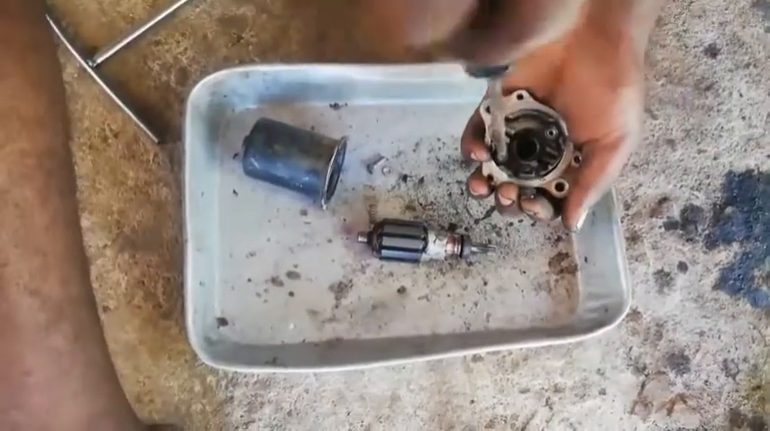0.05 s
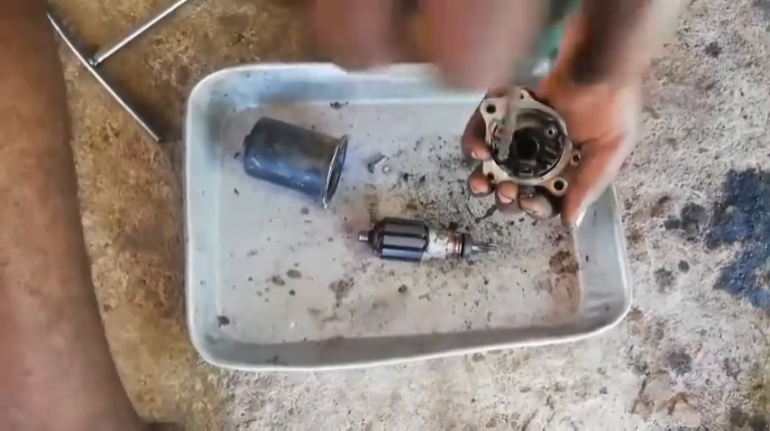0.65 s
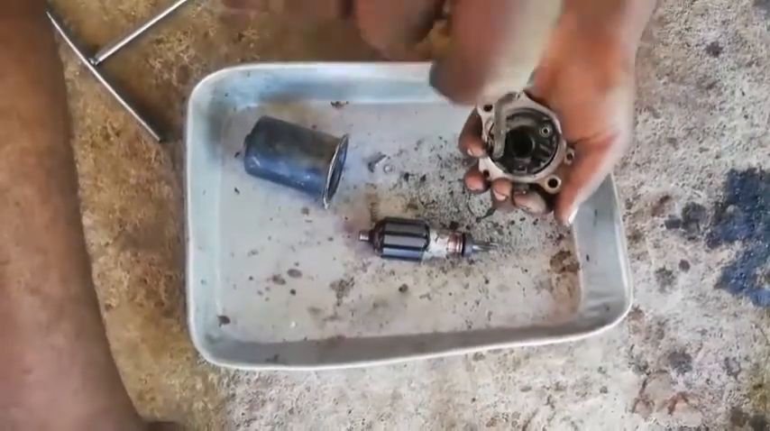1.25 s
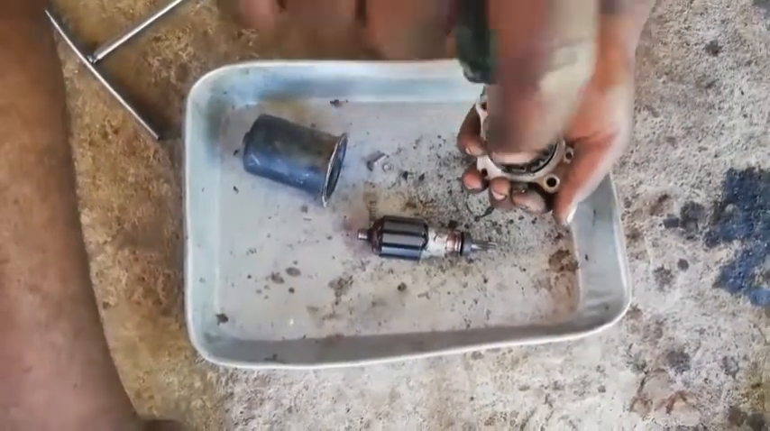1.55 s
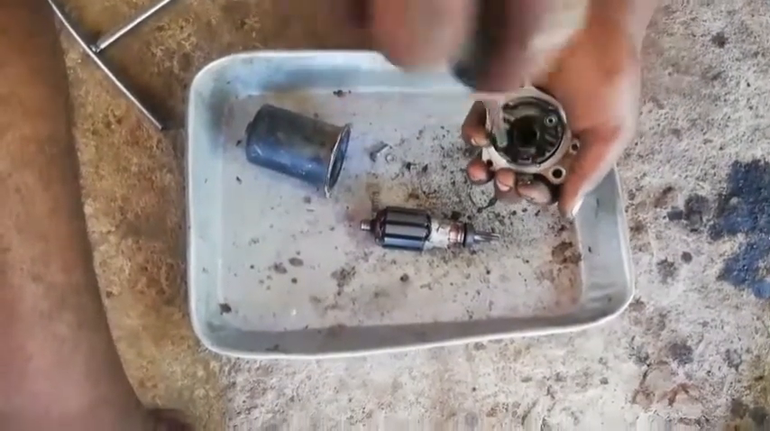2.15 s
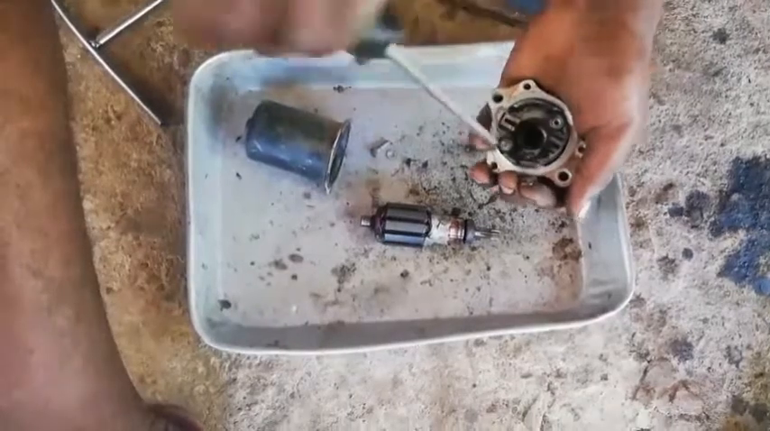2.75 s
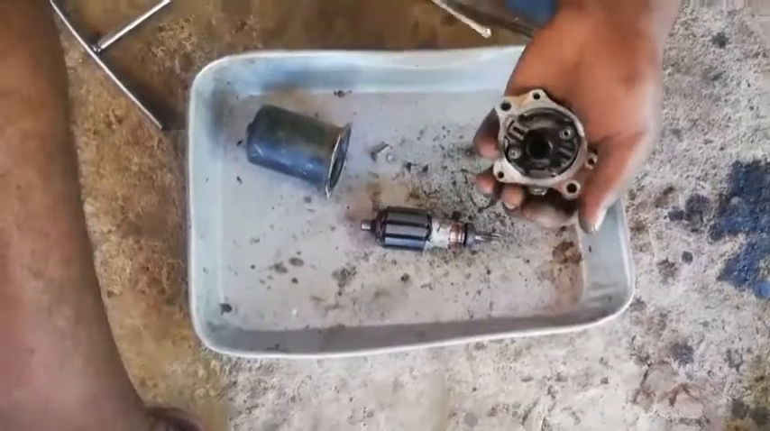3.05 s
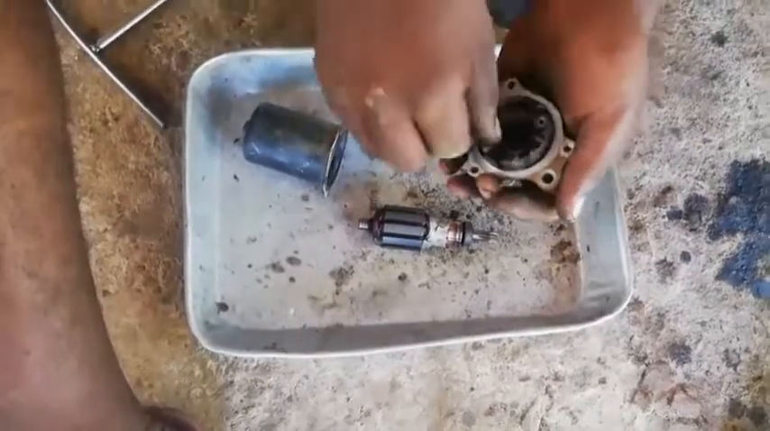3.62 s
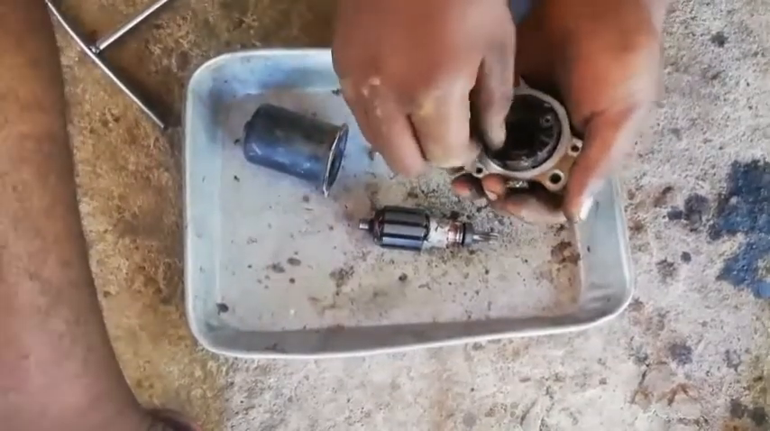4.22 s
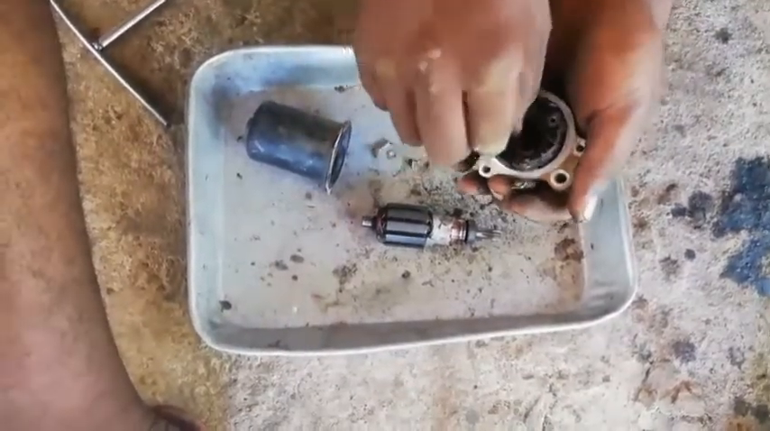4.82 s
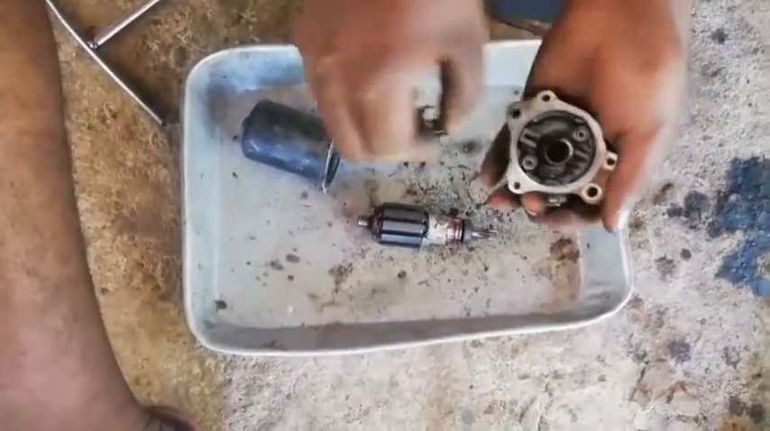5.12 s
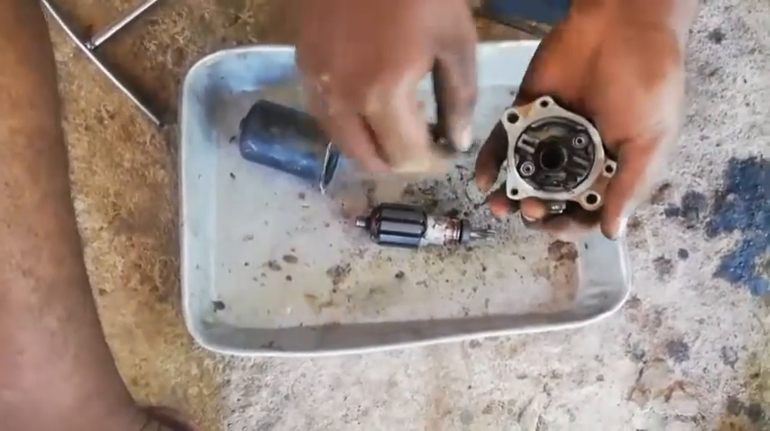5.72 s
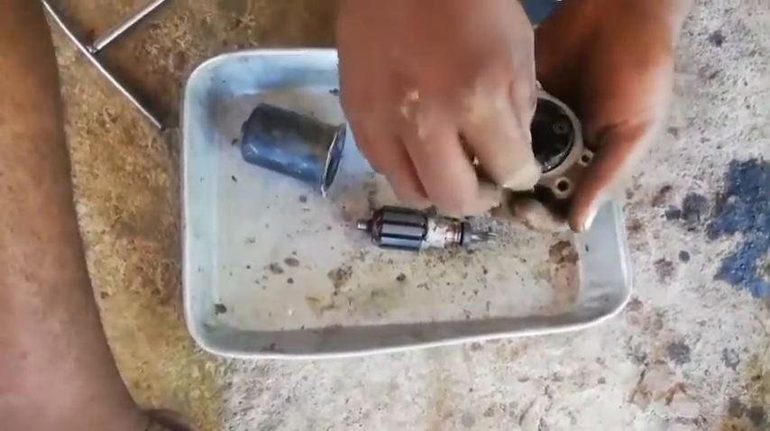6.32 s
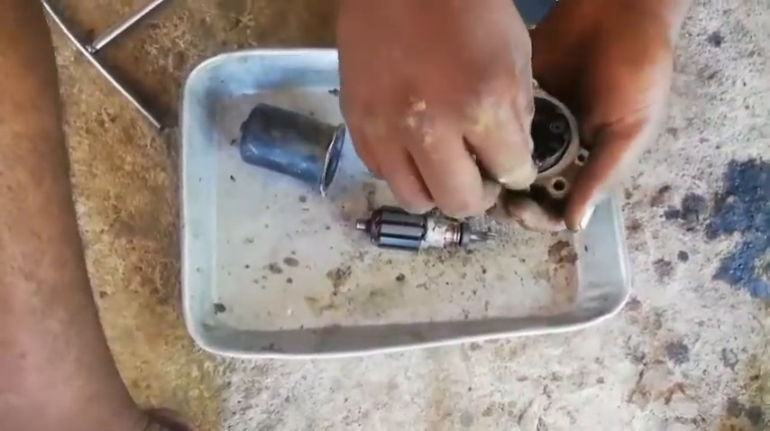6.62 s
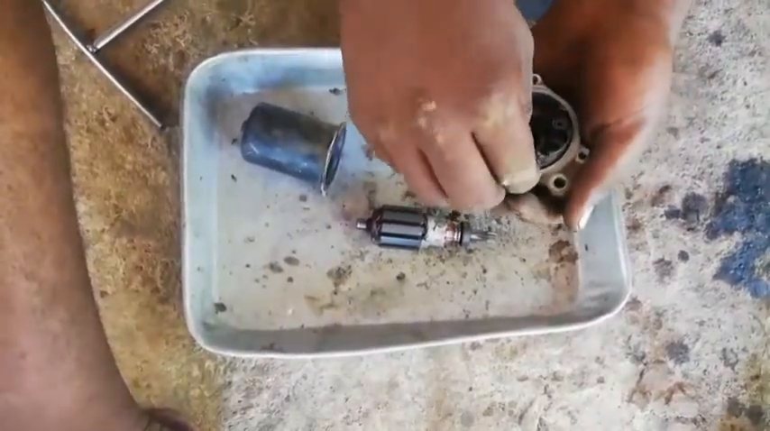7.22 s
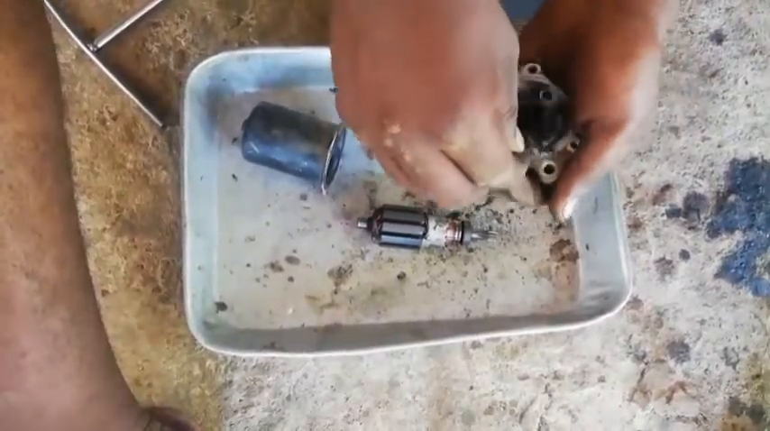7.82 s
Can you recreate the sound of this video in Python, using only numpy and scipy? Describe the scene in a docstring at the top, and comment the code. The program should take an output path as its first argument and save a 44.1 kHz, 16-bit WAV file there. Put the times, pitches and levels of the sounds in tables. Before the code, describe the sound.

Someone takes a small electric motor apart close to the microphone in a sheltered yard. Dull knocks and short scrapes lead to the thin ring of a steel screwdriver, then a few sharp spring snaps. A dropped metal part crashes and rattles in a tray, and later a stuck piece gives way with a brief rough chatter. Chicks peep nearly throughout, with distant birds, steady hiss and a low, far engine behind.

```python
"""Under an open shelter, chicks peep close by over yard hiss and the hum of a far engine; distant birds
whistle now and then. A small electric motor is taken apart over a tray. A screwdriver knocks on the
housing, metal scrapes over grit, and at about 3 s the screwdriver is put down, its steel shaft ringing.
A small spring snaps. At 5.5 s a metal part falls, bounces and shakes the tray. Near the end a tight
part sticks, slips and gives way in three quick jerks."""
import sys
import numpy as np
from scipy import signal
from scipy.fft import rfft, irfft
from scipy.io import wavfile

SR = 44100
rng = np.random.default_rng(int(sys.argv[2]) if len(sys.argv) > 2 else 0)


def int16_out(signal):
    """Quantize to a 16-bit WAV file."""
    q = np.round(np.clip(np.atleast_2d(signal).T, -1, 1) * 32767)
    wavfile.write(sys.argv[1], SR, q.astype(np.int16))


N = 355886


def from_db(db):
    """Turn decibels into a number to multiply a sound by."""
    return 10 ** (np.asarray(db) / 20)


def rms_one(x):
    """Scale a sound so that its average power is 1."""
    return x / np.sqrt(np.mean(x ** 2) + 1e-20)


def in_time(rows):
    """Join (time, value) points with straight lines, giving a value at every sample."""
    return np.interp(np.arange(N) / SR, *np.transpose(rows))


def at_hz(points, hz):
    """Read between the rows of a (frequency, value) table, with every octave equally wide."""
    known_hz, value = np.transpose(points)
    return np.interp(np.log(np.maximum(hz, 1)), np.log(known_hz), value)


def drift(rate):
    """A random curve around zero that heads for a new value `rate` times a second."""
    knots = rng.standard_normal(4000)
    return np.interp(np.arange(N) / SR * rate, np.arange(len(knots)), knots)


def convolve(x, response):
    """Pass a sound through a filter or a space, given its response to a single click."""
    return signal.fftconvolve(np.atleast_2d(x), np.atleast_2d(response), axes=-1)[:, :N]


def colour(x, points, size=4096):
    """Make each frequency louder or softer as a (frequency, level) table says."""
    gains = from_db(at_hz(points, np.fft.rfftfreq(size, 1 / SR)))
    cepstrum = irfft(np.log(gains))
    # fold the second half onto the first, so the filter never sounds ahead of a hit (minimum phase)
    cepstrum[1:size // 2] *= 2
    cepstrum[size // 2 + 1:] = 0
    return convolve(x, irfft(np.exp(rfft(cepstrum))))


def add(track, s, sound):
    """Mix a sound into a track, starting at s seconds."""
    start = max(int(s * SR), 0)
    track[..., start:start + sound.shape[-1]] += sound[..., :N - start]


def struck(hits, modes, spread_db, contact_s):
    """Each hit rings an object's own tones (modes) unevenly; t60 is the time to fade by 60 dB."""
    out = np.zeros(N)
    t = np.arange(int(SR * max(t60 for _, _, t60 in modes))) / SR
    rise = 1 - np.exp(-(t / contact_s) ** 2)   # the force builds up during the contact
    for s, level_db in hits:
        for k, (hz, mode_db, t60) in enumerate(modes):
            strength_db = level_db + mode_db + spread_db * rng.standard_normal()
            envelope = rise * from_db(strength_db - 60 * t / t60)
            add(out, s, (-1) ** k * envelope * np.sin(2 * np.pi * hz * t))
    return out


def bursts(hits, t60):
    """A fading crack of noise for every hit, different at each microphone."""
    power, t = np.zeros(N), np.arange(SR // 2) / SR
    for s, level_db in hits:
        add(power, s, from_db(level_db - 60 * t / t60) ** 2)
    return np.sqrt(power) * rng.standard_normal((2, N))


def dying_runs(events, gap_s, count=4):
    """Turn each event into a quick, uneven run of ever weaker hits: rows of t/s, level/dB."""
    uneven = rng.uniform(-.15, .15, (len(events), count))
    return [(s + gap_s * (k + (k > 0) * nudge[k]), level_db - loss_db * k)
            for (s, level_db, loss_db), nudge in zip(events, uneven) for k in range(count)]


def whistles(calls, bend, waver, rasp, flutter_db, overtone_db, swell):
    """Calls slide in pitch and turn raspy. More bend delays the slide; more swell delays the peak."""
    out = np.zeros(N)
    wobble, tremor, flutter = waver * drift(120), rasp * drift(480), flutter_db * drift(90)
    for s, length, held_hz, end_hz, level_db in calls:
        progress = np.linspace(0, 1, int(length * SR))
        now = np.clip(int(s * SR) + np.arange(len(progress)), 0, N - 1)
        slide_hz = held_hz + (end_hz - held_hz) * progress ** bend
        hz = slide_hz * (1 + wobble[now] + progress * tremor[now])
        phase = 2 * np.pi * np.cumsum(hz) / SR
        envelope = from_db(level_db + flutter[now]) * np.sqrt(np.abs(np.sin(np.pi * progress ** swell)))
        add(out, s, envelope * (np.sin(phase) + from_db(overtone_db) * np.sin(2 * phase)))
    return out


def yard():
    """Hiss from all around slowly quietens, over a low rumble that is the same on both sides."""
    hiss_tone = [(30, -20.5), (140, -6.5), (280, -4.5), (420, -7.5), (700, -6.5), (930, -1), (1300, -4.5),
                 (1950, 1), (2900, -8.5), (4500, -8.5), (5800, -18), (8100, -13.5), (10500, -27.5),
                 (15500, -50)]   # lows and highs of the hiss: f/Hz, relative level/dB
    hiss_level = [(0, -36), (1.1, -36), (2.9, -38), (6.0, -39.5), (8.07, -42)]   # its slow fade: t/s, level/dB
    rumble_tone = [(15, -14), (35, -3), (60, -0.5), (110, 0), (200, -10), (400, -19), (900, -43.5)]   # lows and highs of the rumble: f/Hz, relative level/dB
    hiss = rms_one(colour(rng.standard_normal((2, N)), hiss_tone))
    hiss *= from_db(in_time(hiss_level) + .5 * drift(5.5))
    rumble = rms_one(colour(rng.standard_normal(N), rumble_tone))
    rumble *= from_db(-53.5 + 1.4 * drift(4.3))
    return hiss + rumble


def far_engine():
    """A far engine hums on one low, wavering note."""
    hum_level = [(0, -50.5), (.6, -50), (1.5, -57.5), (2.2, -52), (3.1, -57), (4.5, -51), (5.9, -59.5),
                 (7.0, -49), (8.07, -54.5)]   # the hum swells and sinks: t/s, level/dB
    hum_hz, waver = 85.4, .028
    phase = 2 * np.pi * np.cumsum(hum_hz * (1 + waver * drift(14))) / SR
    flutter = from_db(1.5 * drift(13))
    return rms_one(np.sin(phase) * flutter) * from_db(in_time(hum_level))


def chicks():
    """Chicks give thin, short peeps that hold their pitch, then drop with a rasp."""
    peeps = [(.04, 5010, 295, -39), (.26, 4845, 150, -33.5), (.44, 5080, 245, -43),
             (0.959, 4880, 200, -46.5), (1.47, 4800, 80, -40.5), (1.58, 4950, 250, -47),
             (2.0, 5050, 304, -40.5), (2.13, 4830, 250, -40), (2.559, 4740, 202, -44),
             (3.055, 4720, 40, -29.5), (3.36, 4960, 398, -44.5), (3.48, 4820, 351, -36.5),
             (3.659, 4680, 150, -36), (3.79, 5196, 344, -32.5), (3.885, 4954, 690, -26.5),
             (4.002, 4856, 406, -32), (4.169, 5214, 200, -32.5), (4.36, 5110, 49.7, -29.5),
             (4.54, 5120, 550, -28.5), (4.70, 5120, 250, -29.5), (4.898, 4840, 393, -31.5),
             (5.081, 5110, 505, -29), (5.274, 4820, 450, -26.5), (5.375, 4783, 101, -25),
             (5.647, 4765, 360, -30.5), (5.83, 4900, 310, -35), (6.05, 5020, 60.3, -31),
             (6.205, 4955, 149, -33), (6.385, 4804, 398, -32), (6.581, 4927, 116, -29),
             (6.755, 5040, 700, -26), (6.944, 4610, 199, -34), (7.09, 4590, 150, -45),
             (7.301, 4700, 247, -41.5)]   # one row a peep: t/s, held pitch/Hz, closing drop/Hz, relative level/dB
    peep_s = .115
    calls = [(s, peep_s, hz, hz - drop_hz, level_db) for s, hz, drop_hz, level_db in peeps]
    return from_db(0.64) * whistles(calls, bend=2.5, waver=0.0032, rasp=.027, flutter_db=2.25,
                                    overtone_db=-18, swell=1.43)


def far_birds():
    """Birds out in the open give faint, longer whistles."""
    # one row a whistle: t/s, length/s, first pitch/Hz, end pitch/Hz, relative level/dB
    calls = [(.35, 0.26, 3460, 3220, -49), (2.45, 0.48, 3590, 3890, -45.5), (5.95, 0.25, 3950, 4220, -43.5),
             (6.10, 0.52, 3610, 3440, -48.5), (6.48, 0.5, 3200, 3150, -52), (6.46, 0.34, 840, 913, -47.5)]
    return from_db(-1) * whistles(calls, bend=1.3, waver=0.011, rasp=0.0086, flutter_db=4.5,
                                  overtone_db=-30, swell=1.0)


def knocks():
    """The screwdriver knocks on the housing; each dull thud dies away almost at once."""
    hits = [(0.594, -24, 1830), (2.3583, -12.5, 1054), (2.828, -28.5, 68.4), (3.03, -26, 1150),
            (3.1226, -2, 976), (3.204, -10.5, 1044), (3.371, -17, 990), (3.402, -24.5, 470),
            (3.421, -29.5, 458), (5.384, -11.5, 1444), (5.399, -14.5, 1400)]   # one row a knock: t/s, level/dB, thud pitch/Hz
    tones = [(.93, -4.5, 0.019), (1.16, 4, 0.011), (.52, -19, 0.072), (.38, -20.5, 0.033),
             (.26, -26, 0.077), (1.8, -8.5, 0.033), (2.25, -13, 0.016), (3.9, -30, 0.0054)]   # tones in a thud: multiple of its pitch, relative level/dB, t60/s
    out = np.zeros(N)
    for s, level_db, hz in hits:
        modes = [(hz * ratio, db, t60) for ratio, db, t60 in tones]
        out += struck([(s, level_db)], modes, spread_db=4.0, contact_s=0.00042)
    return out


def scrapes():
    """Metal is dragged over grit, and the many uneven grains make a rough noise."""
    drags = [(2.992, 0.06, -29.5), (3.04, .085, -32.5), (3.123, .012, -20.5), (3.369, 0.041, -38.5),
             (3.796, .025, -38.5), (5.374, 0.026, -29)]   # one row a drag: t/s, length/s, level/dB
    grit_tone = [(100, -11), (700, -9.5), (1150, 8), (1600, -2.5), (2300, 10.5), (3100, 0), (6000, -7),
                 (9000, -8.5), (12000, -17.5), (15500, -30)]   # lows and highs of the scrape: f/Hz, relative level/dB
    pressure = np.zeros(N)
    for s, length, level_db in drags:
        arch = np.abs(np.sin(np.linspace(0, np.pi, int(length * SR)))) ** .5
        add(pressure, s, from_db(level_db) * arch)
    grains = rng.standard_normal((2, N)) * from_db(3.9 * drift(450))
    return pressure * rms_one(colour(grains, grit_tone))


def shaft_ring():
    """The screwdriver is put down, and its free steel shaft rings on in clear tones."""
    hits = [(3.1305, -25.5)]   # the shaft touches down: t/s, relative level/dB
    modes = [(2560, -5, .25), (3457, 1.5, .55), (4148, -12, .55), (4702, -3, .3), (5200, -10.5, .55),
             (6374, -15, .34), (6683, -6, .58), (8075, -7, .55), (8145, -8, .38), (8803, 1, .58),
             (9464, -7, .3), (10330, -18, .33), (11670, -15, .36), (12980, -16.5, .28)]   # the shaft's tones: f/Hz, relative level/dB, t60/s
    return from_db(0.5) * struck(hits, modes, spread_db=.5, contact_s=.0008)


def spring_snaps():
    """A small spring snaps with bright clicks, nearer the right microphone."""
    hits = [(3.6772, -22), (3.6806, -8), (3.686, -38), (3.808, -28), (3.975, -23.5), (5.4525, -22)]   # one row a snap: t/s, relative level/dB
    modes = [(1800, -28, 0.011), (3630, -7, 0.0079), (6220, -1, 0.015), (7800, -3, 0.012),
             (8620, -2.5, 0.005), (11200, -22, 0.0062)]   # the spring's tones: f/Hz, relative level/dB, t60/s
    balance = [
        [-6],
        [1.0],
    ]   # left row, then right row: gain/dB
    return from_db(balance) * struck(hits, modes, spread_db=1.0, contact_s=.0003)


def clatter():
    """A metal part crashes down, bounces and rings. It shakes the tray, whose base thumps once."""
    landings = [(5.4968, 5.5, 3), (5.5672, -2, 12), (5.599, -15.5, 19)]   # each landing rattles: t/s, relative level/dB, loss per touch/dB
    crash_tone = [(45, -8), (95, -14), (170, -18), (320, -21), (460, -12.5), (750, -14), (1050, -1),
                  (2050, 13.5), (2900, -0.5), (4300, 1), (5400, -7.5), (6600, -6.5), (9000, -12),
                  (11500, -19), (15500, -35)]   # the crash of each touch: f/Hz, relative level/dB
    tray_tone = [(100, -39), (760, -16), (1000, -5), (1500, 2), (2050, 7.5), (2900, -8.5), (4200, -6.5),
                 (5500, -14), (9000, -22), (15000, -57)]   # the tray's many tones, blurred into noise: f/Hz, relative level/dB
    base_modes = [(50, -1.5, 0.13), (165, -5, .05), (290, -1, .04), (637, -2, .08)]   # low tones of the tray's base: f/Hz, relative level/dB, t60/s
    part_modes = [(525, -20, .4), (950, -14, .35), (1152, -7, .4), (1246, -8, .3), (1333, -8, .3),
                  (1423, -6, .32), (1540, -9, .3), (1618, -6, .33), (1740, -3, .32), (1830, -7, .3),
                  (2010, 0, .34), (2137, -2, .33), (2280, -5, .3), (2492, -7, .35), (2677, -10, .3),
                  (3194, -13, .3), (4051, -9, .27), (5170, -14, .3), (5771, -18, .3)]   # the part's own tones: f/Hz, relative level/dB, t60/s
    touches = dying_runs(landings, gap_s=.0075)
    crash = from_db(2.0) * colour(bursts(touches, t60=0.039), crash_tone)
    tray = from_db(-2.0) * colour(bursts(touches, t60=0.23), tray_tone)
    first_landing_s, thump_db = landings[0][0], -20
    thump = struck([(first_landing_s, thump_db)], base_modes, spread_db=1.0, contact_s=.001)
    ring = from_db(-23.5) * struck(touches, part_modes, spread_db=4.5, contact_s=.0003)
    return crash + tray + thump + ring


def slips():
    """A tight part sticks and slips with a gritty chatter; the hand on the housing keeps it short."""
    jerks = [(7.630, -15, 1.5), (7.6428, -13, 2), (7.6546, -11, 7.5)]   # each jerk is a run of slips: t/s, relative level/dB, loss per slip/dB
    grit_tone = [(100, -28), (700, -27), (1100, -2), (2400, 9), (3100, -1), (4000, -4), (4900, -9),
                 (6000, -5), (11000, -15), (15500, -34)]   # grit of the rubbing faces: f/Hz, relative level/dB
    modes = [(1060, -19, 0.017), (1750, -7.5, 0.038), (2070, -5, 0.026), (2450, -5, 0.022),
             (3710, -12, 0.016), (6020, -14, 0.012), (8000, -18, 0.0067), (10700, -32, .012)]   # tones of the held housing: f/Hz, relative level/dB, t60/s
    chatter = dying_runs(jerks, gap_s=0.0042)
    grit = from_db(-8) * colour(bursts(chatter, t60=0.1), grit_tone)
    return grit + from_db(0.5) * struck(chatter, modes, spread_db=3.0, contact_s=0.00032)


def shelter(x, bands=9):
    """Floor, walls and roof throw back a dense echo; each band of frequencies fades at its own speed."""
    fade_times = [(150, 0.87), (1000, 0.31), (2200, 0.31), (5000, 0.51), (9500, 0.32), (15000, 0.54)]   # how long the echo lasts: f/Hz, t60/s
    t, echo = np.arange(int(.6 * SR)) / SR, 0
    edges_hz = np.geomspace(100, 16000, bands + 1)
    for low, high in zip(edges_hz, edges_hz[1:]):
        band_filter = signal.butter(2, [low, high], "band", fs=SR, output="sos")
        band = signal.sosfilt(band_filter, rng.standard_normal((2, len(t))))
        t60 = at_hz(fade_times, np.sqrt(low * high))
        echo = echo + band * from_db(-60 * t / t60)
    echo *= 1 - np.exp(-t / 0.0013)   # the echo takes a moment to build
    echo /= np.sqrt(np.sum(echo ** 2, axis=1, keepdims=True))
    return convolve(x, echo)


def scene():
    """Mix it all: chicks, scrapes and knocks carry the most echo, the other sounds little or none."""
    peeps, thuds, fall, jerks, drags = chicks(), knocks(), clatter(), slips(), scrapes()
    snaps = spring_snaps()
    to_walls = (from_db(0.5) * peeps + from_db(-5.0) * thuds + from_db(0.5) * drags
                + from_db(-17.0) * snaps + from_db(-15.5) * fall + from_db(-14) * jerks)
    direct = from_db(-3.0) * peeps + thuds + drags + shaft_ring() + snaps + fall + jerks
    return direct + shelter(to_walls) + far_birds() + yard() + far_engine()


def record(dry):
    """Two unequal microphones overload on the loudest hits; the very highest sounds are cut away."""
    right_mic = [(60, -1.5), (200, -6), (400, -10.5), (700, -11.5), (1300, -17.5), (2300, -16.5),
                 (3500, -12), (4800, -10), (6300, -5), (8100, 2.5), (10000, 0.5), (15000, 6)]   # the right one is shaded in the middle range: f/Hz, gain/dB
    cutoff_hz = 15700
    both_sides = np.vstack([dry[0], colour(dry[1], right_mic)[0]])
    clipped = np.clip(both_sides, -1, 1)
    return signal.sosfilt(signal.ellip(10, .1, 80, cutoff_hz, fs=SR, output="sos"), clipped)


dry = scene()
out = record(dry)
int16_out(out)
```